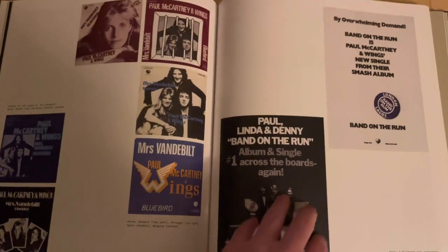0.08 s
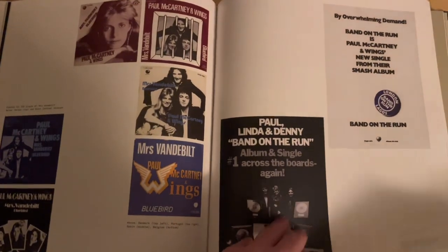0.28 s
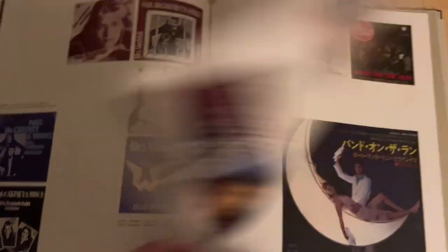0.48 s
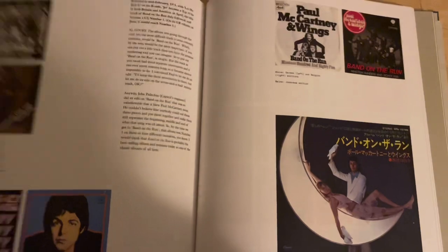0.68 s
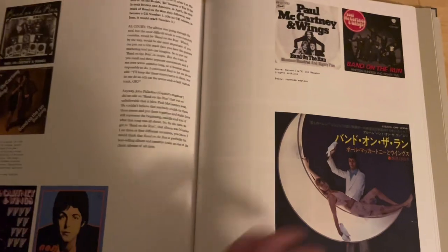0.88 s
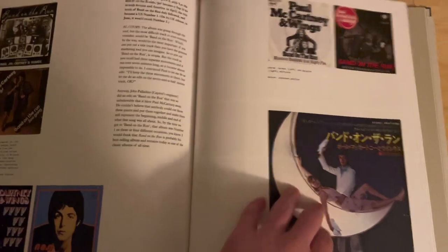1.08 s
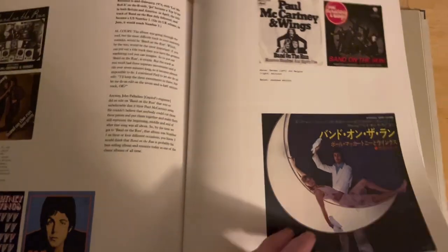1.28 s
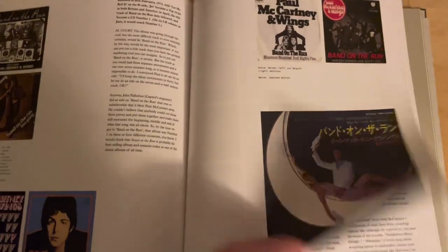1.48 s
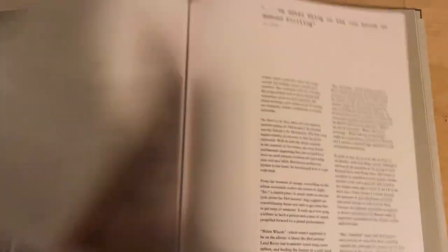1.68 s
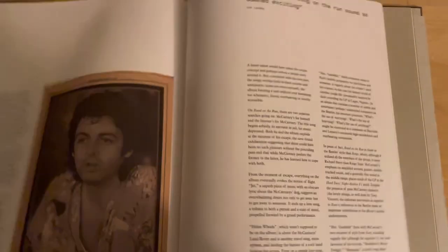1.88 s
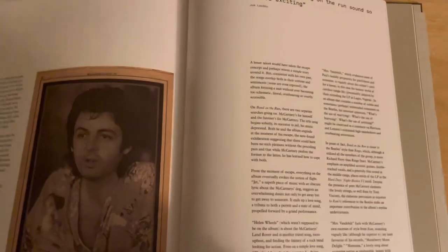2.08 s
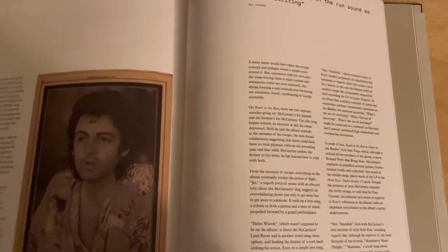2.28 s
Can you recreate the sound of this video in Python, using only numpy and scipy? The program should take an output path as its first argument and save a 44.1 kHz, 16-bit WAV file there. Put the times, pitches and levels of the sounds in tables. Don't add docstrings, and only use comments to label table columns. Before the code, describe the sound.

Page turning in a big heavy book: a crisp corner flick, sliding paper, then a loud flap

```python
import sys
import numpy as np
from scipy import signal
from scipy.fft import rfft, irfft, next_fast_len
from scipy.io import wavfile
from scipy.ndimage import uniform_filter1d, map_coordinates

SR = 44100
rng = np.random.default_rng(int(sys.argv[2]) if len(sys.argv) > 2 else 0)


def waveform_to_disk(signal):
    frames = np.transpose(np.atleast_2d(signal))
    scaled = np.clip(frames, -1, 1) * 32767
    samples = np.round(scaled).astype(np.int16)
    wavfile.write(sys.argv[1], SR, samples)


def voltage_ratio(level):
    return 10 ** (np.asarray(level, float) / 20)


N = 101430

# peak t/s, rise/s, fall/s, level/dB
SLIDE_STROKES = [(0, .02, 0.043, -66), (0.138, 0.027, 0.01393, -62), (.2, 0.049, 0.081, -62.5),
                 (.25, 0.013, 0.073, -51.5), (0.334, 0.013, 0.0067, -50), (.39, 0.017, 0.023, -68),
                 (0.481, 0.075, 0.078, -56.5), (0.571, 0.011, 0.06, -48.5), (0.808, 0.12, 0.078, -58.5),
                 (1.076, 0.022, 0.0485, -60.5), (1.17, 0.042, 0.058, -64.5), (1.27, 0.056, 0.063, -58.5),
                 (1.439, 0.032, 0.0561, -55.5), (1.591, 0.061, 0.027, -53.5), (1.73, 0.092, 0.08, -52),
                 (1.86, 0.017, 0.084, -49.5), (2.002, 0.0034, 0.01726, -65.5),
                 (2.077, 0.049, 0.0416, -60.5), (2.179, 0.032, 0.086, -65.5), (2.225, 0.0069, 0.052, -62),
                 (2.29, 0.03, 0.036, -67.5)]
# t/s, lift of the top/dB
AIRY_LIFT = [(0, -7), (.2, -1), (.235, -20), (.3, -18), (.34, -7), (.65, -4), (1.2, -1.5), (1.75, 0),
             (1.87, -4.5), (2.3, -4)]
# f/Hz, level per Hz/dB
SLIDE_COLOUR = [(150, -43.5), (250, -13), (700, -13), (1100, -8), (1770, -5), (2380, -5.5), (5730, -11.5),
                (7400, -9), (9620, -33), (16300, -120)]
# f/Hz, level per Hz/dB
AIRY_COLOUR = [(5000, -41.5), (7400, 0.5), (9500, -2), (11000, -5.5), (13000, -12.5), (14500, -8.5),
               (15700, -7.5), (16200, -34.5)]
# f/Hz, level/dB
OWN_HISS = [(150, -10.5), (600, -4), (2000, -13.5), (4000, 0), (6000, 1), (7600, -14.5), (9300, -2),
            (11500, -14.5), (15000, -14.5)]
# peak t/s, level/dB, f/Hz, width/s, glide/octaves per width
SHEET_POPS = [(0.2284, -15.5, 2207, 0.001, -0.072), (0.2298, -34, 6330, 0.0013, 0),
              (.2297, -38.5, 7280, 0.00087, 0.1), (0.23, -36.5, 3846, 0.0012, -0.088),
              (0.2301, -24, 4814, 0.0014, 0), (0.231, -23, 2691, 0.0011, 0),
              (0.2351, -30, 1500, 0.000765, 0.26), (0.2262, -24, 2355, 0.00079, -0.23),
              (0.533, -47, 807, 0.0015, -0.68), (.568, -25.5, 600, 0.00097, -0.3),
              (0.5672, -33, 2555, 0.00064, -0.73), (0.62, -30.5, 524, 0.002, 0.065),
              (.651, -33, 520, 0.0026, 0.07), (0.7228, -47, 1050, 0.0014, 0.011),
              (.7996, -44.5, 4924, 0.00049, 0), (.8005, -59, 1022, 0.00117, 0),
              (.805, -53.5, 1000, 0.0015, 0), (.804, -56.5, 2404, 0.00186, 0),
              (0.8159, -47, 1150, 0.00096, 0.18), (.822, -58, 1200, 0.0013, -0.54),
              (.831, -53, 1140, 0.000848, 0.22), (1.2725, -43.5, 1084, 0.00064, 0.48),
              (1.2746, -31, 1640, 0.00078, -0.035), (1.2776, -28.5, 1920, 0.00063, -0.041),
              (1.281, -38, 1829, 0.0017, -0.16), (1.7302, -29.5, 896, 0.00088, 0),
              (1.7351, -30, 315, 0.0023, -0.3), (1.8439, -28, 5250, 0.00013, -1.34),
              (1.8448, -35.5, 6220, .0005, 0), (1.847, -28, 2540, 0.00035, -0.34),
              (1.844, -37, 12640, 0.00011, 0), (1.8573, -33, 910, 0.00106, 0),
              (1.857, -31.5, 2640, 0.00053, 0.09), (1.866, -34, 763, 0.0048, -0.12),
              (1.867, -28, 2560, 0.00047, -0.13), (1.8448, -19, 1000, 0.000538, -0.53),
              (1.8473, -20, 511, 0.0021, -0.33), (2.003, -50, 2340, 0.00062, -0.27),
              (2.22, -52.5, 2525, 0.00094, 0), (2.234, -50.5, 810, 0.00115, -0.29),
              (.562, -50, 5000, .0003, 0), (.585, -41, 698, 0.0018, 0), (.645, -36, 604, 0.0011, 0.029),
              (0.679, -43.5, 455, .003, -0.087), (0.691, -49, 601, 0.0016, 0.069),
              (1.589, -49, 1105, 0.0017, -0.048), (1.597, -44.5, 346, 0.0026, -0.4),
              (1.658, -45.5, 300, 0.0016, 0), (1.7263, -31, 500, 0.00045, -0.039),
              (1.742, -40, 600, 0.00067, 0), (1.764, -48.5, 593, 0.0024, -0.1),
              (1.8715, -26, 478, 0.001, 0.044), (1.863, -24.5, 520, 0.00087, 0.14)]
# t/s, level/dB, centre f/Hz, hold/s, time to fall 60 dB/s
SHEET_FLAPS = [(.13, -62, 480, 0.0117, 0.0427), (.218, -43, 1800, 0.0052, 0.027),
               (.228, -41.5, 556, 0.0029, 0.17), (.234, -62, 2000, .004, .3), (.572, -45.5, 486, 0.1, 0.27),
               (.572, -51, 1200, 0.067, 0.22), (.59, -46.5, 280, 0.024, 0.2), (.72, -53, 972, 0.018, 0.12),
               (.8, -67, 1096, 0.0317, 0.062), (.76, -62, 4710, 0.11, .15), (.57, -56, 6230, 0.01, .08),
               (.235, -52.5, 2580, 0.026, .12), (1.06, -62.5, 384, 0.042, 0.072),
               (1.27, -47, 650, 0.012, 0.079), (1.285, -70, 1850, 0.038, 0.5),
               (1.53, -59, 960, 0.012, 0.118), (1.585, -57, 680, 0.02, .08),
               (1.698, -52.5, 1200, 0.012, 0.089), (1.728, -41, 650, 0.0109, 0.1),
               (1.845, -30.5, 422, 0.021, 0.12), (1.848, -28.5, 845, 0.012, 0.12),
               (1.85, -33, 2300, 0.0081, 0.1), (2.07, -62.5, 870, 0.021, 0.14),
               (2.22, -67, 457.4, 0.049, 0.15), (2.255, -59.5, 890, 0.017, 0.053)]
# t/s, level/dB, centre f/Hz, hold/s, time to fall 60 dB/s
AIR_PUSHES = [(.23, -51.5, 135, 0.031, 0.28), (.24, -55, 65, 0.018, .3), (.34, -51, 116.3, 0.02, 0.12),
              (.34, -55.5, 65.5, 0.012, 0.15), (.533, -47, 150, 0.026, .04), (.565, -47.5, 65, 0.053, 0.28),
              (.57, -49.5, 126, 0.047, 0.41), (1.07, -54.5, 125.3, 0.048, 0.0614),
              (1.07, -63, 60.77, .04, 0.1), (1.272, -53.5, 131, 0.036, 0.14),
              (1.275, -66, 63.6, 0.09, 0.148), (1.59, -50.5, 137, 0.0157, 0.17),
              (1.6, -55.5, 60, 0.034, 0.53), (1.73, -43, 90, 0.01, 0.243), (1.845, -47, 130, 0.034, 0.31),
              (1.85, -50.5, 61, 0.048, 0.32), (2.22, -65, 120, 0.036, .15)]
# f/Hz, level/dB
PORT_STEP = [(100, .1), (400, 1.7), (900, 1.1), (2500, .7), (5000, .1)]
# f/Hz, lead/radians
PORT_LEAD = [(500, 0), (1600, .8), (5600, 0), (6900, -2.6), (8000, -3.2), (10300, -6.1), (12300, -6.5),
             (13300, -9.2), (15200, -9.5), (15700, -10.5)]
# f/Hz, level/dB
PAGE_ECHO = [(60, -31), (150, -10), (600, -11.5), (1300, -0.5), (2600, -5), (4000, -3.5), (6000, 1),
             (8000, 4)]
# f/Hz, time to fall 60 dB/s
PAGE_DECAY = [(150, 0.023), (2000, 0.0067), (9000, .006)]
# f/Hz, level/dB
WALL_ECHO = [(60, -7.5), (1200, 0), (4500, -4.5), (7500, -7.5)]
# f/Hz, time to fall 60 dB/s
ROOM_DECAY = [(150, 0.35), (1500, 0.26), (9000, 0.055)]
# f/Hz, level per Hz/dB
HUSH_COLOUR = [(26, -26), (45, 6.5), (134, -4), (200, -16), (564, -19), (1060, -25.5), (3170, -34.5),
               (15000, -53)]

AIRY_DB, GRIT_DB, GRIT_PER_S = -3.5, 0.5, 420
FLANK_POWER = 1.6
CRACK_DB, CRACK_REACH, TAIL = -10, 1.154, 1.14
SHARPNESS, ATTACK_S, LUMPY_DB = 1.98, 0.0066, 4
ROOM_DB, HUSH_DB = -13.5, -70.5
TOP_HZ = 15770


def unit(x):
    return x / np.sqrt(np.mean(x ** 2) + 1e-20)


def along(points, hz):
    f, value = np.transpose(points)
    return np.interp(np.log(hz + 1), np.log(f + 1), value)


def wobble(rate, size):
    knots = rng.standard_normal(int(size * 1000 / SR) + 4)
    return map_coordinates(knots, [np.arange(size) * rate / SR])


def filtered(x, response):
    m = next_fast_len(x.shape[-1] + 8192)
    spectrum = rfft(x, m) * response(np.fft.rfftfreq(m, 1 / SR))
    return irfft(spectrum, m)[..., :x.shape[-1]]


def hiss(colour, patchy_db):
    z = signal.stft(rng.standard_normal(N), nperseg=512)[2]
    patches = uniform_filter1d(rng.standard_normal(z.shape), 6, 0)
    patches = unit(uniform_filter1d(patches, 6, 1))
    noise = signal.istft(z * voltage_ratio(patchy_db * patches), nperseg=512)[1][:N]
    return unit(filtered(noise, lambda hz: voltage_ratio(along(colour, hz))))


def sliding():
    t = np.arange(N) / SR
    power = np.zeros(N)
    for peak, rise, fall, db in SLIDE_STROKES:
        distance = abs(t - peak) / np.where(t < peak, rise, fall)
        power += voltage_ratio(2 * db) * np.exp(-2 * distance ** FLANK_POWER)
    grit = unit(voltage_ratio(GRIT_DB * wobble(GRIT_PER_S, N) + 1.6 * wobble(40.07, N)))
    strength = np.sqrt(power) * grit
    lift = voltage_ratio(AIRY_DB + np.interp(t, *np.transpose(AIRY_LIFT)))

    def rub():
        return strength * (hiss(SLIDE_COLOUR, patchy_db=2.27) + lift * hiss(AIRY_COLOUR, patchy_db=1.7))

    shared = rub()
    own = np.array([rub(), rub()])
    return shared, filtered(own, lambda hz: voltage_ratio(along(OWN_HISS, hz)))


def pops():
    t = np.arange(-1000, 1000) / SR
    out = np.zeros(N + 2000)
    for peak, db, hz, width, glide in SHEET_POPS:
        pitch = hz * 2 ** (glide * np.clip(t / width, -2.5, 2.5))
        cycles = (np.cumsum(pitch) - pitch[t < 0].sum()) / SR
        tone = np.cos(2 * np.pi * cycles + rng.normal(0, 0.6))

        def crack_band(f):
            low_cut = f * f / (f * f + hz * hz / 4)
            return low_cut / (1 + (f / (CRACK_REACH * hz)) ** 6)

        crack = unit(filtered(rng.standard_normal(len(t)), crack_band))
        side = np.where(t < 0, width, TAIL * width)
        shape = 1 / np.cosh(np.clip(t / side, -30, 30))
        out[round(peak * SR):][:len(t)] += voltage_ratio(db) * shape * (tone + voltage_ratio(CRACK_DB) * crack)
    return out[1000:N + 1000]


def flaps(rows, lumpy_db):
    t = np.arange(SR // 2) / SR
    out = np.zeros(N + SR)
    for start, db, centre, hold, t60 in rows:

        def resonance(f):
            damping = 1j * f * centre / SHARPNESS
            return (damping / (centre * centre - f * f + damping)) ** 2

        noise = filtered(rng.standard_normal(len(t)), resonance)
        noise = noise * voltage_ratio(lumpy_db * wobble(99.5, len(t)))
        shape = voltage_ratio(-60 * np.maximum(t - hold, 0) / t60) * (1 - np.exp(-t / ATTACK_S))
        level = voltage_ratio(db) * np.sqrt(np.mean(shape ** 2))
        out[round(start * SR):][:len(t)] += level * unit(noise * shape)
    return out[:N]


def two_ports(book):
    def response(hz):
        phase = np.outer([.5j, -.5j], along(PORT_LEAD, hz))
        step_db = np.outer([1, -1], along(PORT_STEP, hz))
        return np.exp(phase) * voltage_ratio(step_db)
    return filtered(book, response)


def echo(x, surface, decay, wait):
    hz, t, z = signal.stft(rng.standard_normal((2, SR // 3)), SR, nperseg=128)
    fade = voltage_ratio(-60 * t / along(decay, hz)[:, None])
    tail = signal.istft(z * fade, SR, nperseg=128)[1]
    tail = tail / np.linalg.norm(tail[0])
    back = filtered(x, lambda f: voltage_ratio(along(surface, f)))
    back = np.pad(back, (round(wait * SR), 0))
    return signal.fftconvolve(back[None], tail, axes=1)[:, :N]


def room_hush():
    middle = hiss(HUSH_COLOUR, patchy_db=0.2)
    sides = np.outer([1, -1], hiss(HUSH_COLOUR, patchy_db=0.2))
    return voltage_ratio(HUSH_DB) * (middle + .35 * sides)


def scene():
    shared, own = sliding()
    blows = pops() + flaps(SHEET_FLAPS, LUMPY_DB) + flaps(AIR_PUSHES, lumpy_db=0.84)
    book = shared + blows
    pages = echo(blows, PAGE_ECHO, PAGE_DECAY, wait=.0003)
    room = voltage_ratio(ROOM_DB) * echo(book, WALL_ECHO, ROOM_DECAY, wait=.0045)
    return two_ports(book) + own + pages + room + room_hush()


def roll_off(x):
    return signal.sosfilt(signal.butter(12, 16230, fs=SR, output="sos"), x)


def record(dry):
    mix = filtered(dry, lambda hz: hz < TOP_HZ)
    return roll_off(mix)


dry = scene()
out = record(dry)
waveform_to_disk(out)
```